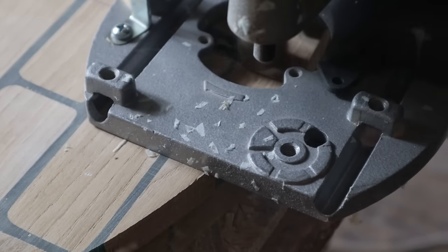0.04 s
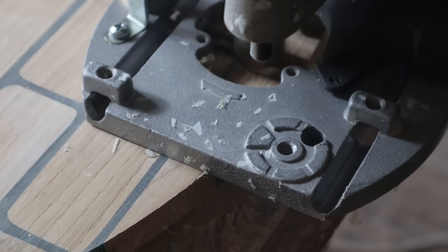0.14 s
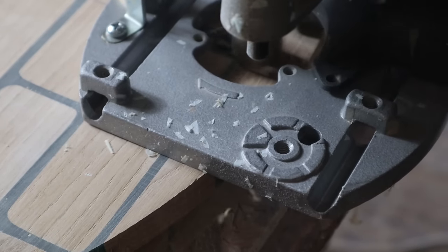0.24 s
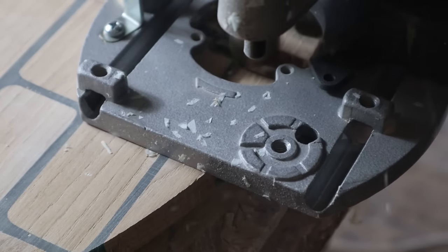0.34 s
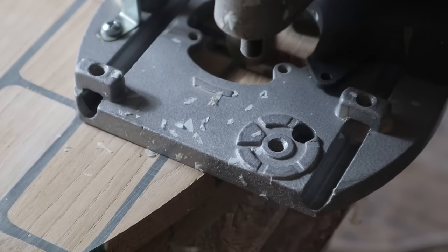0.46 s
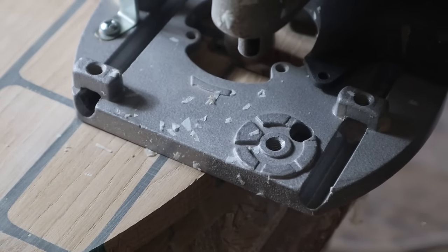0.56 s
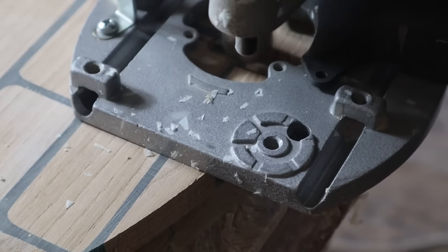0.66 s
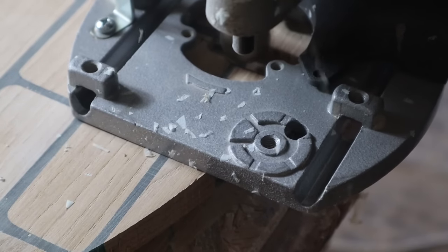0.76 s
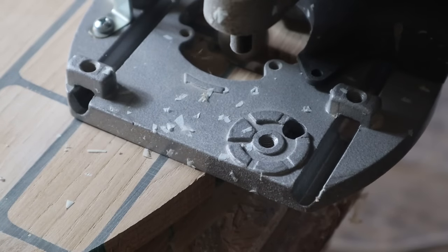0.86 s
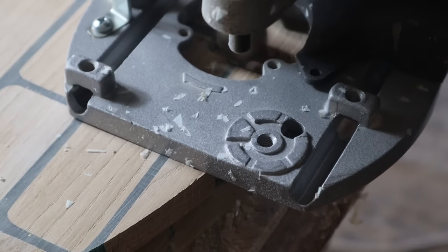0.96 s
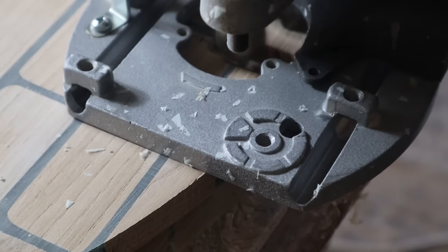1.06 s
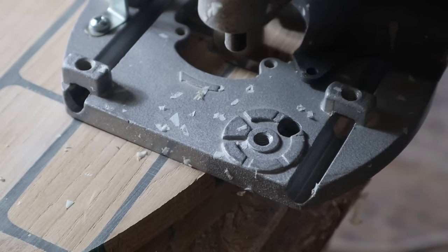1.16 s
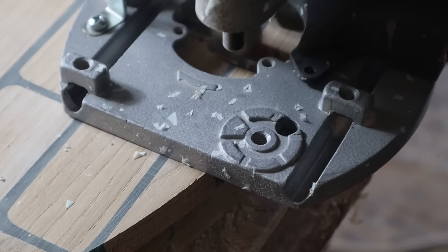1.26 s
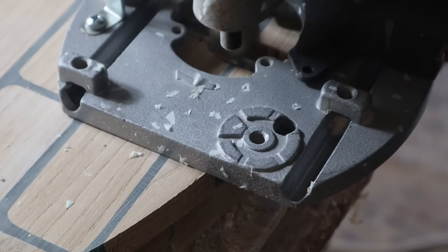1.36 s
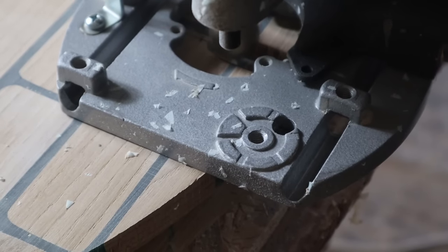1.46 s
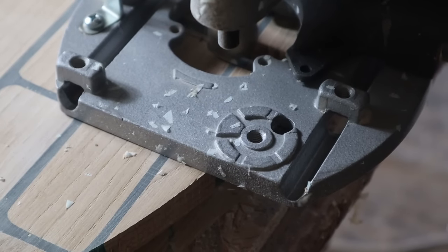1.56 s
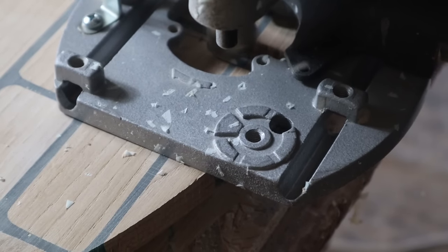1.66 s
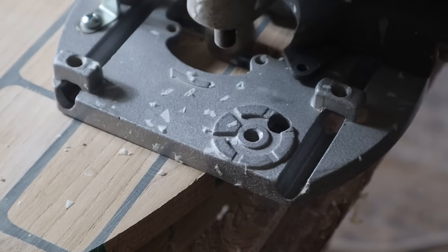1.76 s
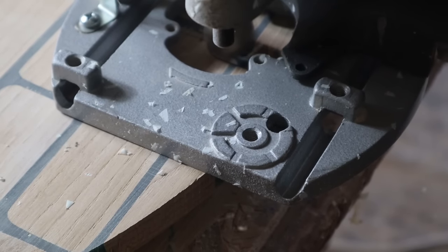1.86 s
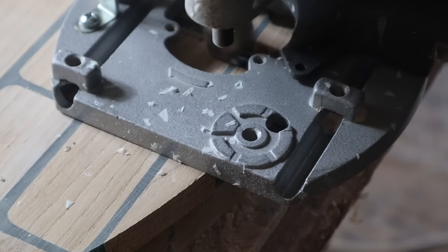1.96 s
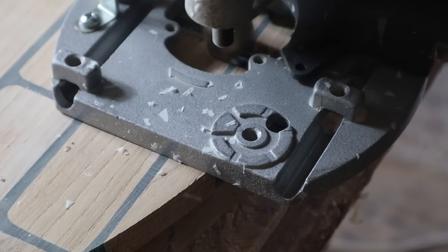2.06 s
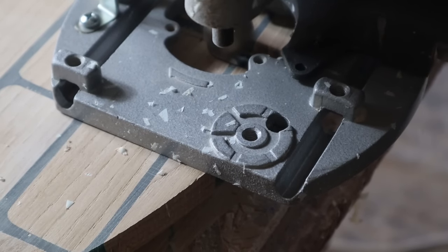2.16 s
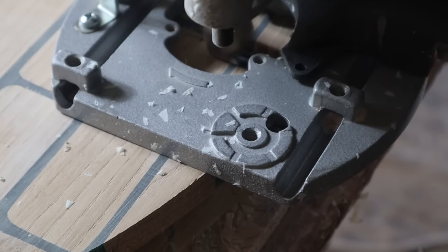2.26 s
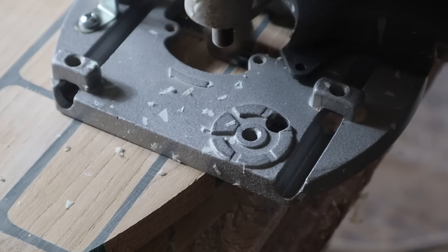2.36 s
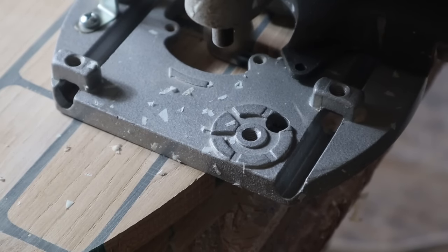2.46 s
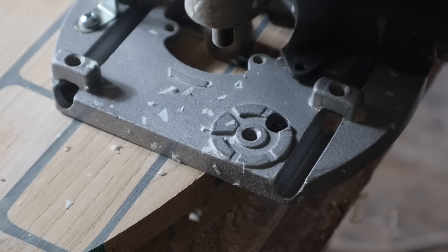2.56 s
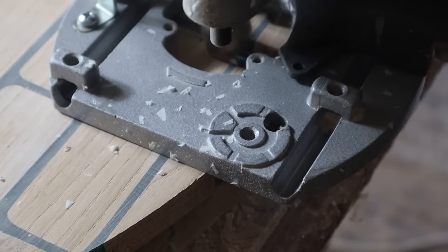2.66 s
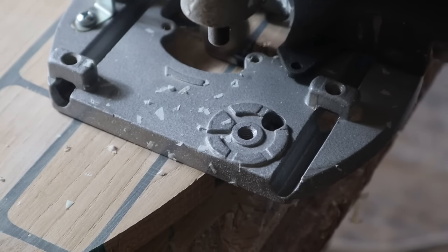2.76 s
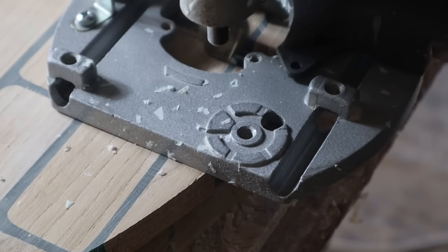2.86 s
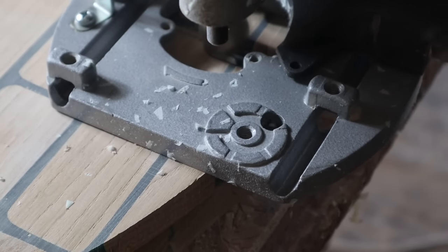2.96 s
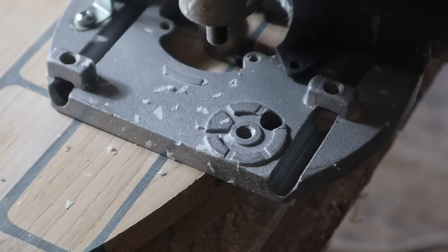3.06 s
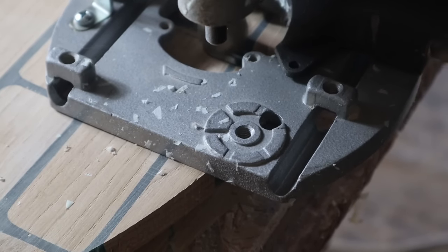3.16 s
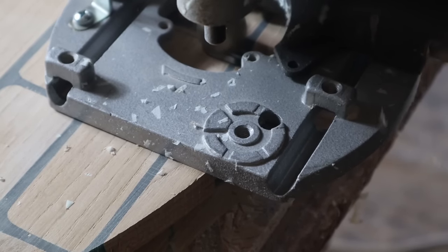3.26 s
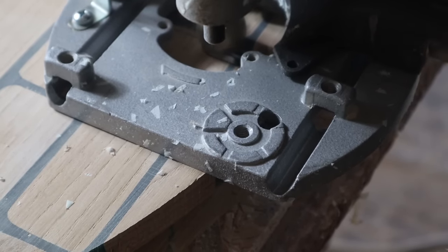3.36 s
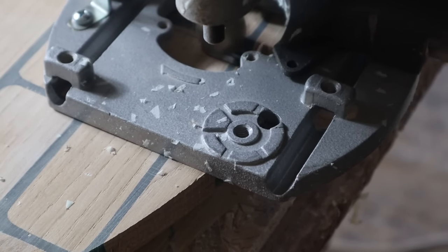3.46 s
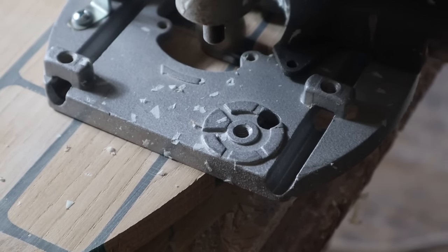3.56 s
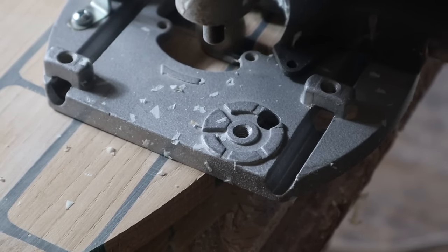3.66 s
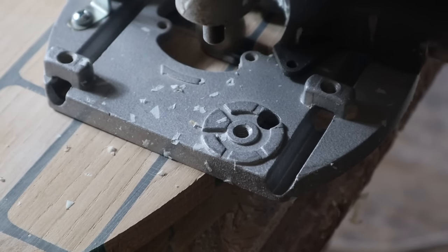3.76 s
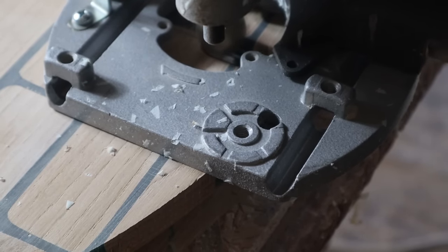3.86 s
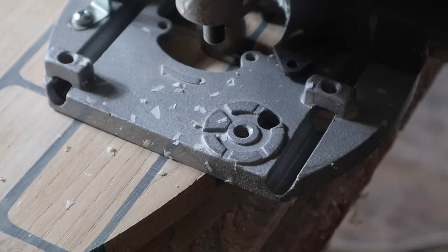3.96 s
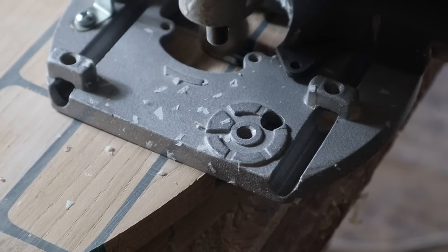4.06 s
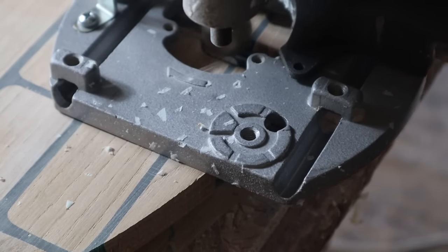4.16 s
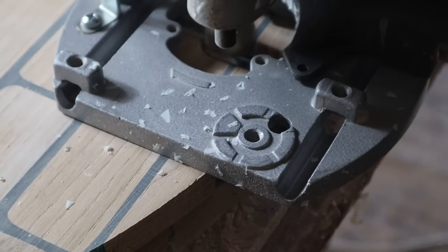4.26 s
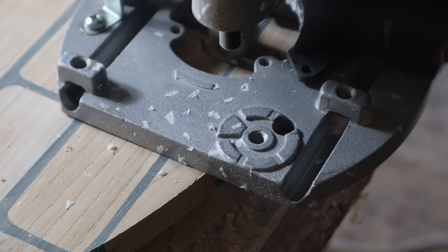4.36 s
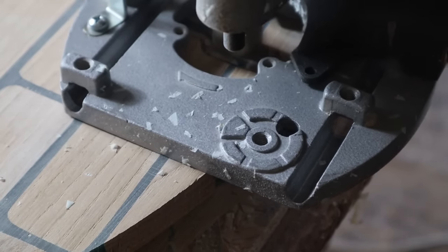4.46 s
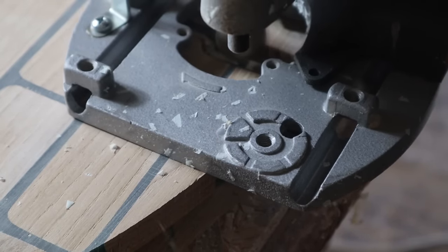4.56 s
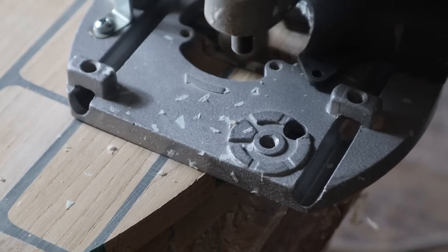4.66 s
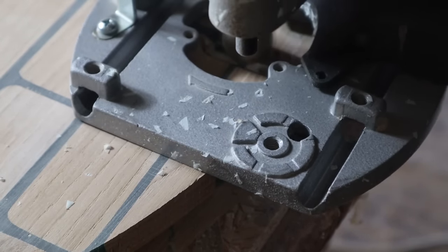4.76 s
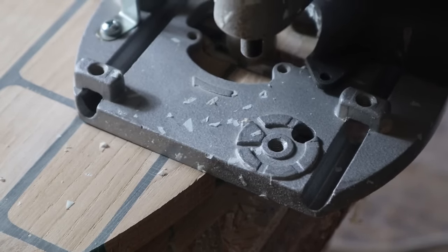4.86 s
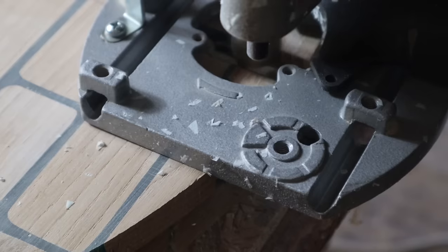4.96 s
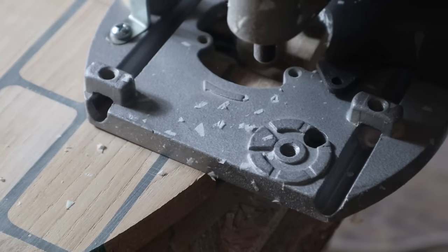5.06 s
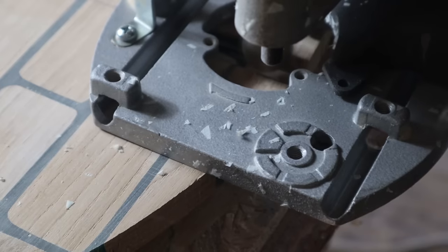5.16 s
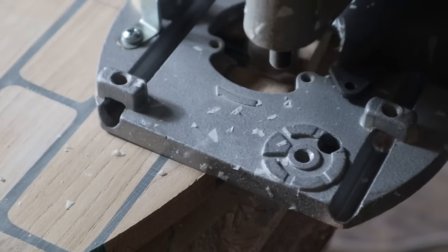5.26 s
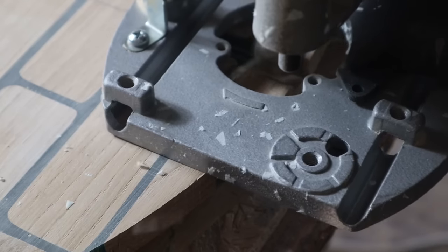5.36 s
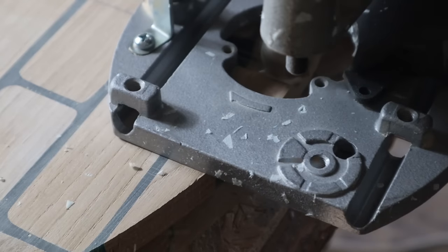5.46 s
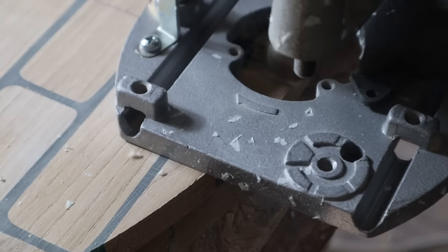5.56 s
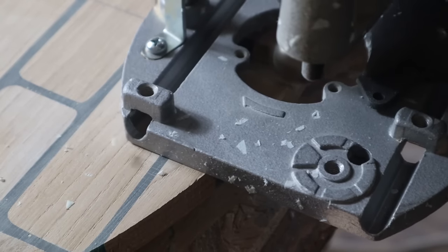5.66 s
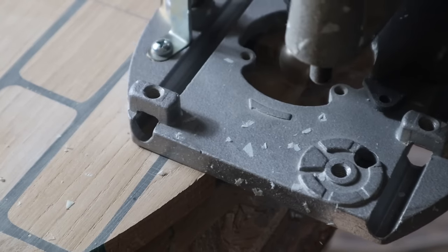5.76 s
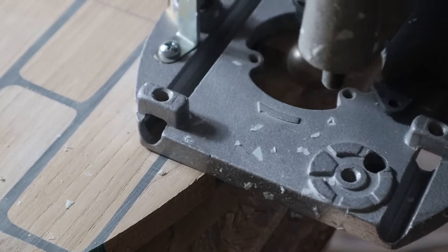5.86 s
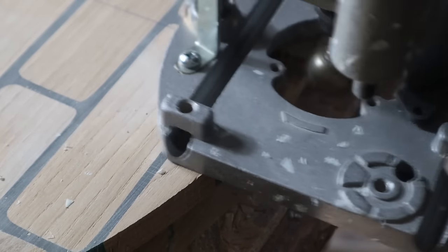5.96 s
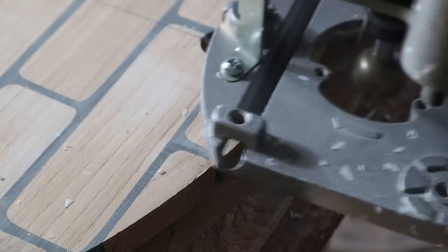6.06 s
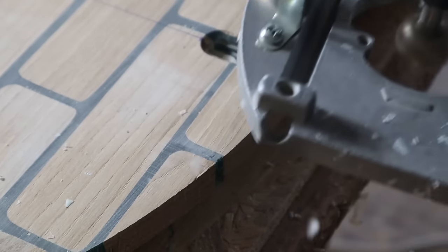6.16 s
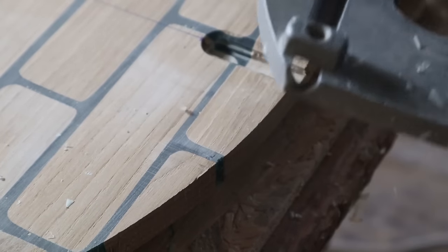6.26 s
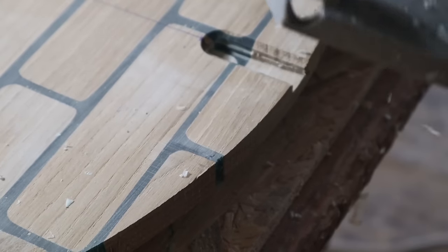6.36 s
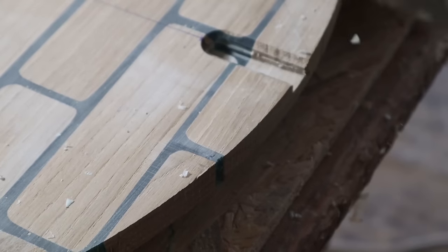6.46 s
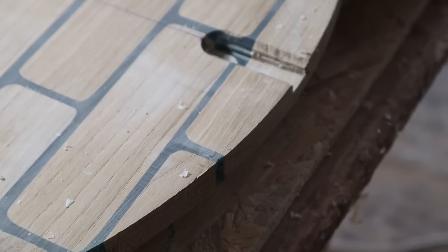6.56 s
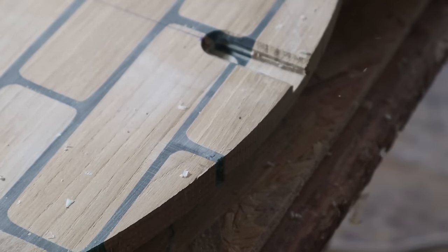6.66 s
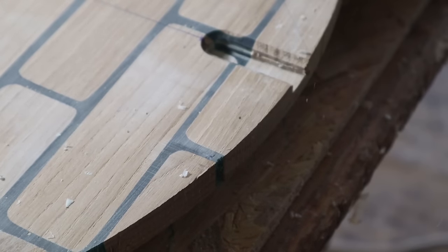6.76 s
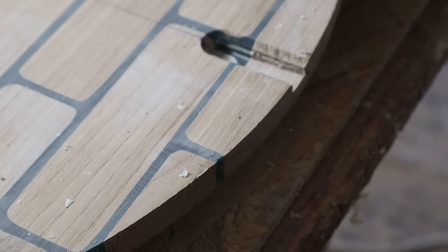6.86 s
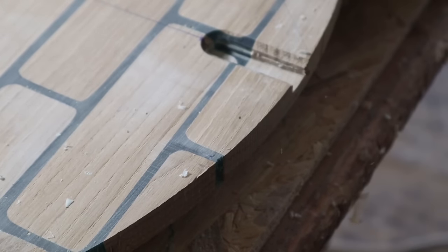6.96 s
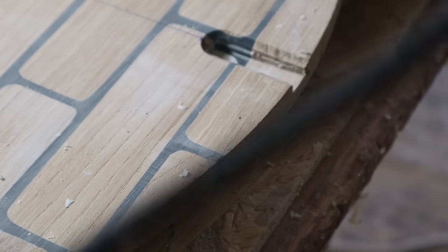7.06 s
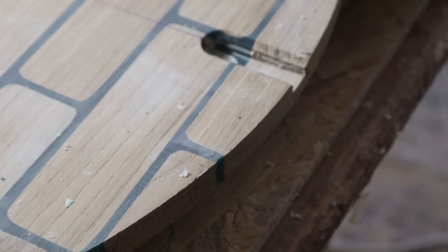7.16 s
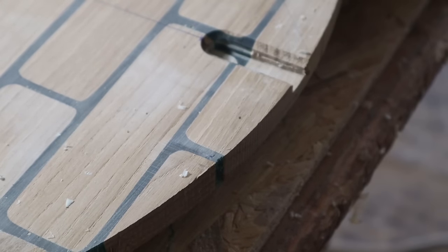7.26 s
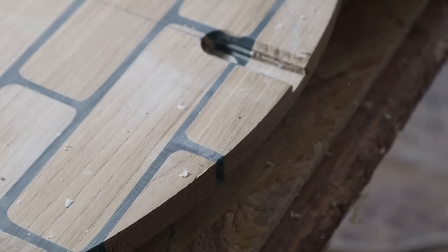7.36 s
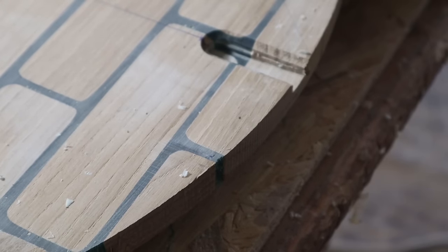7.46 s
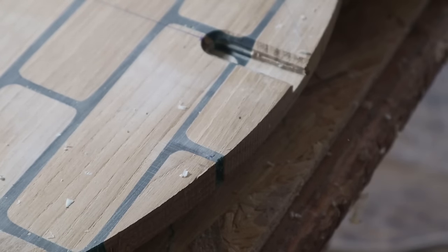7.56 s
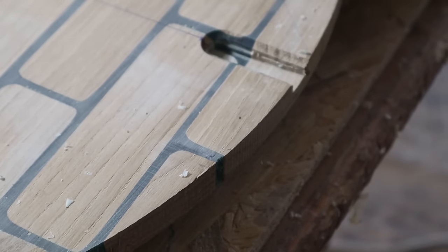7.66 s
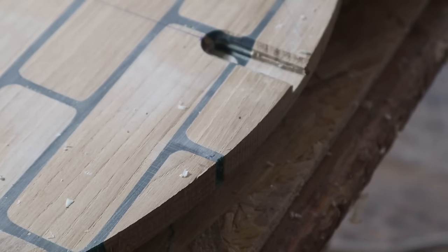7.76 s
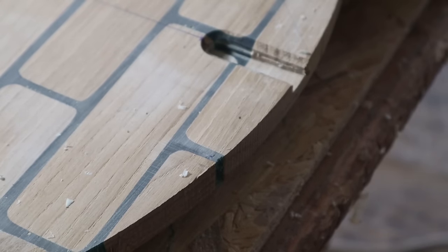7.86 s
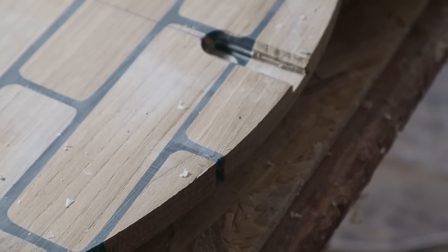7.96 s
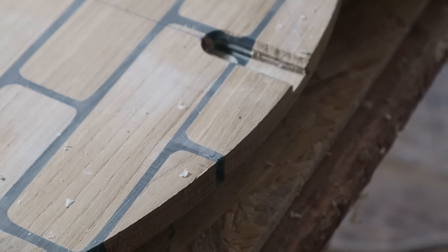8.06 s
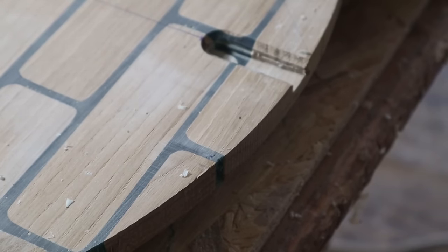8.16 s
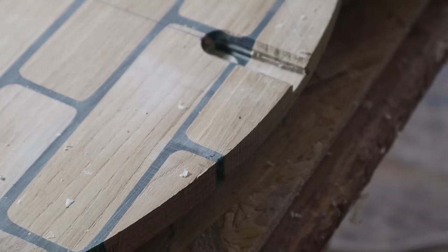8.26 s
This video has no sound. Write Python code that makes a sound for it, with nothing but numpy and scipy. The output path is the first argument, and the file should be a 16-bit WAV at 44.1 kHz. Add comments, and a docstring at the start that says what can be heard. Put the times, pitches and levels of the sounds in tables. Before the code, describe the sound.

Close, steady electric router whine with hissing airflow and irregular knocks of wind on the microphone, ending in a smooth, fading spin-down.

```python
"""A plunge router runs at full speed on a hardwood board: shaft and cooling fan give a stack of whining tones,
the fan's air rushes through the housing, and its exhaust throws eddies that thump and knock at the microphone.
At 5.75 s it is switched off and lifted away; the tones fall as air drag and friction slow the shaft.
From about 6 to 7 s a band of hiss sweeps down as the vents swing past, then the tool is turned away.
Echoes of the tones grow as it moves off, and a faint low room drone lies under everything."""
import sys
import numpy as np
from scipy import signal
from scipy.io import wavfile
from scipy.ndimage import uniform_filter1d

SR = 44100
rng = np.random.default_rng(int(sys.argv[2]) if len(sys.argv) > 2 else 0)


def wav_record(signal):
    """Record a signal, one row per channel, as 16-bit PCM in the file named by sys.argv[1]."""
    frames = np.transpose(np.atleast_2d(signal))
    bounded = np.clip(frames, -1, 1)
    # unit amplitude maps onto the largest positive 16-bit level
    quanta = np.round(bounded * 32767).astype(np.int16)
    wavfile.write(sys.argv[1], SR, quanta)


N = 366905
TIME = np.arange(N) / SR
CUTOFF_HZ = 15400  # nothing is heard far above this
OFF_S, LIFT_S = 5.7545, 0.31  # switch-off, and the time then taken to lift the tool clear


# Speed under power. Columns: start_s, turns_per_s
SPEED = [(0, 528), (.4, 529.3), (.8, 533.5), (1.15, 536.3), (1.95, 536.9), (2.66, 542), (3.0, 536.3),
         (3.2, 534.6), (3.58, 528.6), (3.79, 530), (4.44, 540.9), (5.1, 545.2), (5.72, 545)]
# Braking by the fan (as the square of its speed) and by the bearings (evenly)
DRAG_PER_TURN, FRICTION_HZ_PER_S = .0006063, 21.04


def shaft_speed():
    """Turns per second: nearly steady under power, then air drag and friction slow the shaft."""
    running, = read_curve(SPEED)
    even = np.sqrt(FRICTION_HZ_PER_S / DRAG_PER_TURN)  # the speed at which both brakes are equal
    off_for_s = np.maximum(TIME - OFF_S, 0)
    return even * np.tan(np.arctan(running / even) - DRAG_PER_TURN * even * off_for_s)


# Where the tool is. Columns: start_s, position (0 on the board, 1 lifted with open vents, 2 turned away)
POSITION = [(0,0.35),(5.75,0.34),(6.2,0.97),(6.55,0.88),(7.0,1.2),(7.25,1.39),(7.6,1.74),(8.32,2.4)]


def tool_position(times=TIME):
    """How far the tool has moved from the board, which changes its colour and direction."""
    return read_curve(POSITION, times)[0]


def lifted():
    """0 on the board, 1 once the tool is clear of it."""
    return np.clip((TIME - OFF_S) / LIFT_S, 0, 1)


# On the board, the three lowest tones swell and fade as the tool shifts.
# Hum, one wave per turn. Columns: start_s, level_db, left_minus_right_db
HUM = [(0, -42, 15), (.5, -47.5, 6), (.85, -37.5, 7), (1.55, -34.5, 9), (2.1, -37.5, 6), (2.28, -46, 21),
       (2.68, -33.5, 13), (2.9, -43, 13), (3.15, -35, 5.5), (3.65, -47, 11), (4.15, -34.5, 4),
       (4.42, -40, 14), (4.62, -35.5, 30), (5.35, -32.5, 15)]
# Its octave. Columns: start_s, level_db
OCTAVE = [(.25, -34), (.55, -42), (1.15, -39.5), (2.1, -45), (2.3, -37.5), (2.7, -38), (2.87, -46.5),
          (3.4, -36.5), (4.08, -45), (4.3, -40.5), (4.85, -41), (5.3, -32.5), (5.75, -34.5)]
# Its third harmonic. Columns: start_s, level_db
THIRD = [(.25, -43), (.8, -35), (1.6, -35), (2.7, -40.5), (2.95, -36.5), (4.6, -38), (5.05, -45.5),
         (5.72, -43)]
# Its fourth harmonic. Columns: start_s, level_db
FOURTH = [(1.1, -49), (1.6, -62), (2.8, -61), (3.1, -43), (3.55, -43.5), (4.0, -56), (5.0, -57),
          (5.75, -43)]
# The fan's blade tone, eight waves per turn. Columns: start_s, level_db, left_minus_right_db
BLADE = [(0, -42, 3), (.7, -38, 18), (2.4, -37.5, 29), (3.1, -39, 16), (4.4, -38.5, 17), (4.95, -40, 13),
         (5.3, -39, 5), (5.72, -34.5, 2), (5.88, -41, 4)]
# The whine an octave above it. Columns: start_s, level_db, left_minus_right_db
WHINE = [(0, -33, 28), (.6, -36, 2), (1.05, -31.5, -2), (1.85, -29, -13), (2.45, -37.5, -3),
         (3.3, -33.5, 3), (3.7, -32, 3), (4.4, -32.5, -2), (4.9, -36.5, 9), (5.55, -30.5, -6.5)]
# In the air the whine is beamed past the two microphone ports as the tool turns.
# Columns: position (no unit), left_minus_right_db, left_lead_rad
WHINE_AIM = [(.5, 3, 3), (.9, -7, -1.9), (1.15, 3, 1), (1.42, 5, -0.5), (1.7, -1, 2.0)]
# The two lowest tones dip briefly after switch-off. Columns: centre_s, half_length_s, depth_db
DIPS = [(5.825, 0.064, 7), (5.955, 0.022, 6), (6.19, .05, 12)]
TWELFTH_DB = -47.5  # a thin twelfth order, steady on the board
HUM_ROUGH, LIFTED_ROUGH = 0.096, 0.057  # wavering of the two lowest tones, and what lifting adds
COASTING_ROUGH = 0.31  # extra roughness of the third and fourth orders once lifted


def motor(angle, speed):
    """Unbalance and cutter give the low orders (waves per turn); fan blades give multiples of eight."""
    up = lifted()
    position = tool_position()

    def lifting(board_db, board_pan_db, in_air):
        """Blend level and balance from the board to the air."""
        air_db, air_pan_db = in_air
        return (1 - up) * board_db + up * air_db, (1 - up) * board_pan_db + up * air_pan_db

    hum, octave, third, fourth, blade, twelfth, whine, whistle = coasting(speed, flicker_db=2.0)
    waver = HUM_ROUGH + LIFTED_ROUGH * up
    ragged = COASTING_ROUGH * up
    dip = from_db(-bumps(DIPS, TIME))

    out = dip * tone(angle, *lifting(*read_curve(HUM), hum), spread=0.12, rough=waver)
    octave_mix = lifting(*read_curve(OCTAVE), 2 * drift(0.73), octave)
    out += dip * tone(2 * angle, *octave_mix, spread=0.9 - .5 * up, rough=waver)
    third_mix = lifting(*read_curve(THIRD), 2 + drift(.7), third)
    out += tone(3 * angle, *third_mix, spread=.3, rough=.17 + ragged)
    fourth_mix = lifting(*read_curve(FOURTH), drift(.7), fourth)
    out += tone(4 * angle, *fourth_mix, spread=.6, rough=.2 + ragged)
    out += tone(12 * angle, *lifting(TWELFTH_DB, drift(.7), twelfth), spread=.6, rough=.3)

    blades = 8 * angle
    blade_mix = lifting(*read_curve(BLADE), blade)
    out += tone(blades, *blade_mix, spread=0.82, rough=0.18 + ragged / 3, lead=0.48 + 1.0 * up)
    aim_db, aim_rad = read_curve(WHINE_AIM, position)
    whine_db, whine_pan_db = whine
    whine_mix = lifting(*read_curve(WHINE), (whine_db, whine_pan_db + aim_db))
    out += tone(2 * blades, *whine_mix, spread=0.8 - .6 * up, rough=0.12 + ragged / 4, lead=up * aim_rad)

    # the top whistle crosses the ports as the tool swings away (lead in radians)
    crossing = np.interp(position, [1.05, 1.45], [-2.6, 2.9])
    whistle_db, whistle_pan_db = whistle
    whistle_pan_db = whistle_pan_db + drift(1.9)
    return out + tone(4 * blades, whistle_db, whistle_pan_db, spread=0.2, rough=0.18, lead=crossing)


# Clear of the board, each tone changes with the speed.
# Columns: order (waves per turn), full_speed_db (before resonances and top loss),
# loss_db (per halving of speed), left_minus_right_db
COASTING = [(1, -42.5, 6.5, -1), (2, -39.5, 17.5, 0), (3, -44.5, 8.5, 0), (4, -43, 18, -10),
            (8, -50.5, -5, 4), (12, -41.5, 20, -5), (16, -25, 31, 0), (32, -20.5, 19.5, 2)]
# Resonances that lift or sink a tone falling through them. Columns: pitch_hz, half_width_hz, change_db
RESONANCES = [(289.5, 4, -18), (305, 4.6, 4.5), (318, 6.6, -5), (330, 3.4, 6), (374, 24, 7.5),
              (496, 12, 10.5), (970, 29, 0), (2480, 130, 0), (2670, 70, 9), (2920, 130, 11), (4300, 160, 6),
              (4720, 130, 6), (6700, 240, 4), (8150, 350, 4), (10650, 900, 3.5), (11600, 130, -5),
              (13050, 170, -8), (13600, 300, -4)]
TOP_HZ, TOP_LOSS_DB_PER_KHZ = 13900, 19  # above this the tones are lost


def coasting(speed, flicker_db):
    """Level and balance of each main tone in the air, shaped by shaft speed and resonances."""
    halvings = np.log2(speed.max() / speed)
    for order, full_speed_db, loss_db, pan_db in COASTING:
        hz = order * speed
        top_db = TOP_LOSS_DB_PER_KHZ * np.maximum(hz - TOP_HZ, 0) / 1000
        level_db = full_speed_db - loss_db * halvings + bumps(RESONANCES, hz) - top_db
        yield level_db + flicker_db * drift(6.7), pan_db


def tone(phase, level_db, pan_db, spread, rough, lead=0):
    """One order of the shaft; turbulence shakes it and shifting reflections turn it between the ears."""
    apart = (lead + spread * drift(0.35)) * np.array([[1], [-1]]) / 2  # radians, left then right
    shaken = phase + rough * drift(31)
    loudness = np.sqrt(2) * from_db(level_db) * panned(pan_db) * (1 + rough * drift(14.0))
    return loudness * np.sin(shaken + apart)


# Levels below are those at top speed; all of these tones weaken as the shaft slows.
# A sixth order sings at first, then sinks into the rush. Columns: start_s, level_db
FLUTTER = [(0,-42),(.45,-35.5),(1.0,-50),(5.8,-44),(6.2,-44),(8.32,-49)]
# A faint fifth order surfaces now and then. Columns: start_s, level_db
FIFTH = [(0,-49),(1.2,-39),(1.8,-43),(2.5,-41),(3.7,-39.5),(4.4,-43),(5.8,-52)]
# Other faint tones. Columns: order (waves per turn), peak_db (relative to the AIR level)
OVERTONES = [(7,-15),(15,-13),(17,-31),(24,-17),(48,-16)]


def overtones(angle, speed):
    """Uneven blades and commutator bars add faint orders that come and go, and weaken with the speed."""
    rush_db, _ = read_curve(AIR)
    out = tone(6 * angle, *read_curve(FLUTTER), drift(1), spread=1.0, rough=0.44)
    out += tone(5 * angle, *read_curve(FIFTH), drift(1), spread=1.0, rough=.4)
    for order, level_db in OVERTONES:
        audible = np.clip((CUTOFF_HZ - order * speed) / 500, 0, 1)  # silent above the cutoff
        shaken = order * angle + rng.uniform(0, np.pi, (2, 1)) + .5 * drift(23)
        out += audible * from_db(rush_db + level_db + 2 * drift(0.74)) * np.sin(shaken)
    return out * speed / speed.max()


# Rush of air. Columns: start_s, level_db (around 3 kHz, before a fixed lift in rush()),
# hiss_db (extra, growing from 4 kHz to its full value at 8 kHz)
AIR = [(0, -29, 1), (1.9, -30.5, 1.5), (5.58, -30.5, 0.7), (6.55, -32.5, 2), (6.9, -31.5, 2),
       (7.46, -38, 4), (7.85, -38, 6.5), (8.32, -37.5, 9.5)]
# Colour of the rush in each position. Columns of all three: pitch_hz, relative_level_db
ON_BOARD = [(100,-9),(450,-10.5),(700,-7.5),(1400,-5),(2000,-3),(2720,0),(3300,2.55),(5200,-8.5),(7700,-4),(9000,-7),(11100,3),(12100,-4.5),(13500,-8),(15000,-23)]
LIFTED = [(100,-40),(480,-13.5),(800,-6.5),(1050,-5.5),(1450,-1.5),(2000,-6),(2950,2),(4000,-4.5),(5000,-6),(7500,-5.5),(9900,-6),(12000,-8),(13200,-15),(15000,-54)]
AWAY = [(100,-36),(420,-9.5),(620,-6),(880,-0.5),(1100,-4),(1600,-0.5),(1900,-2),(2700,6),(3750,-6),(4600,-8),(6500,-13),(9500,-22),(12000,-19.5),(15000,-67)]
# Narrow resonances of housing and base plate on the board. Columns: pitch_hz, half_width_hz, change_db
HOUSING = [(2220, 310, 0), (2600, 49, 0.5), (2870, 74, 2), (3070, 60, -1), (3200, 71, -0.5), (3300, 50, -3),
           (4000, 70, 1.5), (6370, 76, -0.5)]
# A band of hiss sweeps down as the vents swing past. Columns: start_s, centre_hz, boost_db
SWEEP = [(6.1, 11600, 2), (6.35, 11000, 5), (6.6, 9880, 7), (6.8, 9750, 5), (7.0, 8950, 4.5),
         (7.12, 8500, 2)]
SWEEP_HALF_WIDTH_HZ = 1300
# How alike left and right hear the rush on the board. Columns: pitch_hz, likeness (0 to 1, no unit)
LIKENESS = [(100,0.88),(600,0.28),(1300,0.36),(2400,0.14),(4000,0.45),(5000,0.45),(7500,0.3),(10000,0.076),(12500,0.27)]
LIFTED_LIKENESS = 0.64  # in free air, at all pitches


def rush(flutter_db, patchy_db, size=1024):
    """Fan air as noise, coloured by the housing and by the way the vents face."""
    hz, times, (shared, left, right) = signal.stft(rng.standard_normal((3, N)), SR, nperseg=size)
    rush_db, hiss_db = read_curve(AIR, times)
    position = tool_position(times)
    up = np.interp(times, TIME, lifted())

    colour_db = np.outer(bumps(HOUSING, hz), 1 - up)
    for place, colour in enumerate([ON_BOARD, LIFTED, AWAY]):
        nearness = np.maximum(1 - abs(np.clip(position, 0, 2) - place), 0)
        colour_db = colour_db + np.outer(at_hz(colour, hz), nearness)
    sweep_hz, sweep_db = read_curve(SWEEP, times)
    colour_db = colour_db + sweep_db * np.exp(-((hz[:, None] - sweep_hz) / SWEEP_HALF_WIDTH_HZ) ** 2)
    gain = from_db(colour_db + np.outer(np.clip(hz / 4000 - 1, 0, 1), hiss_db))
    # the band around 3 kHz sets the level
    body = (hz > 2300) & (hz < 4000)
    gain *= from_db(rush_db + 1.5) / np.sqrt(np.sum(gain[body] ** 2, axis=0) / len(hz))

    # reflections off board and base plate ripple the colour, differently at each port, and shift slowly
    ripple = rng.standard_normal((2,) + gain.shape)
    ripple = uniform_filter1d(uniform_filter1d(ripple, size=4, axis=1), size=60, axis=2)
    alike = np.clip((1 - up) * at_hz(LIKENESS, hz)[:, None] + up * LIFTED_LIKENESS, 0, 1)
    late = np.exp(-1j * port_lead(hz[:, None], position))
    pan_db = np.interp(position, [.35, .85, 1.15, 1.6], [0.0, -3.0, -.5, 2.5])
    gain = gain * panned(pan_db)[:, None]
    ears = np.sqrt(alike) * np.array([shared, shared * late])
    ears = ears + np.sqrt(1 - alike) * np.array([left, right])
    spectrum = gain * from_db(patchy_db * rms_one(ripple)) * ears
    air = signal.istft(spectrum, SR, nperseg=size)[1][:, :N]
    return butter(air, 90, "high", order=4) * from_db(flutter_db * drift(34))


def port_lead(hz, position, opposed_rad=3.1):
    """Radians the left port leads: lifted, the right is nearer; away, treble comes in opposition."""
    lead_s = np.interp(position, [0, .85, 1.05, 1.4, 2], [.000005, -.00004, -.00003, .00008, .00014])
    return np.clip(2 * np.pi * hz * lead_s, -opposed_rad, opposed_rad)


# The strongest eddies on the microphone; a hard push makes a knock, a weak one a thump.
# Columns: start_s, suction_db, push (times the suction, no unit), left_minus_right_db
EDDIES = [(0.099, -23, 1.6, -7), (0.172, -20, 0.91, -7.0), (0.2271, -24, 0.6, -4.0),
          (0.3776, -20.0, 1.4, -3), (0.413, -24, 1.0, 5.0), (0.4396, -26, 0.9, 4), (0.4884, -22, 1.4, 6.0),
          (0.5373, -22, 1.0, 8), (0.574, -24, 1.1, -8), (0.7923, -22, 1.5, -2), (0.9322, -18, 1.9, 7),
          (1.032, -19, 0.6, -1), (1.0836, -25.0, 0.5, 0.0), (1.102, -21, 1.4, -4.0),
          (1.2883, -23.0, 0.8, -2.0), (1.3687, -21.5, 0.7, 1), (1.5418, -23, 0.98, -10),
          (1.5697, -17.5, 0.93, 3), (1.7063, -24, 1.6, -10), (1.7164, -23.0, 0.8, 9),
          (1.7998, -20.5, 0.3, -10.0), (1.8245, -20, 1.1, 1), (1.902, -17.5, 1.8, 5),
          (1.961, -17, 1.1, -5.0), (1.9896, -14.5, 0.8, 2.0), (2.02, -19, 0.6, -5.0),
          (2.1162, -18.5, 1.2, 5), (2.2617, -23, 1.5, 1), (2.3252, -21, 1.2, 4.0), (2.502, -15.5, 1.4, 8),
          (2.5476, -28, 1.4, 11), (2.5783, -23, 1.0, 5.0), (2.6464, -20.5, 0.7, 8), (2.7535, -23, 1.1, 4.0),
          (3.0145, -19, 0.89, 4.0), (3.0315, -24, 1.9, 7), (3.1874, -20, 1.2, 6), (3.3948, -19, 1.5, 9.0),
          (3.461, -21, 0.65, -6), (3.8975, -24, 0.8, 11), (3.926, -18.5, 1.4, 5.0), (4.0032, -19, 0.8, 2),
          (4.021, -17, 0.2, -1.0), (4.075, -22, 0.6, 0), (4.117, -21.5, 0.65, 7), (4.1691, -17.5, 1.4, 7),
          (4.2886, -19, 0.7, -6.0), (4.3732, -18.0, 0.78, 1), (4.421, -19, 1.2, -10), (4.5084, -19, 0.2, 1),
          (4.5398, -21, 0.22, 4), (4.6239, -12, 1.1, -9), (4.959, -23, 1.1, 6.0), (5.056, -18.5, 0.54, 5.0),
          (5.122, -20.5, 0.8, 10), (5.1822, -22, 0.9, 0), (5.292, -21, 0.2, 2), (5.414, -22.5, 0.7, 5.0),
          (5.5923, -23.0, 1.1, -5.0), (5.6196, -22, 0.8, 5.0), (5.7164, -19, 0.44, 5.0),
          (5.98, -34, 1.0, -9), (6.428, -29, 0.2, -5.0), (6.4537, -25, 0.5, -8.0),
          (6.5744, -26.5, 1.1, 5.0), (6.5973, -30, 0.5, -7.0), (6.9224, -33, 1.4, 6),
          (7.1717, -32.5, 0.2, -7.0), (7.2074, -30.0, 0.23, 8.0)]
# Lulls in the stream of small eddies. Columns: centre_s, half_length_s, depth_db
LULLS = [(.02, 0.047, 19), (.31, 0.032, 21), (3.6, 0.19, 2), (4.81, .08, 9), (6.12, .12, 8)]
STREAM_DB, STREAM_LIFTED_DB = -37.5, -56  # the stream on the board and lifted
WAKE_DB, WAKE_S = -7, 0.031  # small eddies trailing each big one: level relative to it, fading time


def exhaust(per_s, uneven_db, count=2400):
    """Big eddies in the exhaust knock and pop over a stream of small ones."""
    s, peak_db, push, pan_db = np.transpose(EDDIES)
    big = pressure_dips(s, from_db(peak_db) * panned(pan_db), push,
                        crossing_s=0.00078, soft_hz=323, bass_hz=52.7, push_hz=990)
    times, chance = rng.random((2, count)) * [[N / SR], [1]]
    sizes_db = uneven_db * np.clip(rng.standard_normal(count), -2, 1.2)
    happens = chance < per_s * N / SR / count
    gains = happens * from_db(sizes_db) * panned(rng.normal(0, 3.8, count))
    small = pressure_dips(times, gains, push=0.51,
                          crossing_s=0.0021, soft_hz=235, bass_hz=54, push_hz=910)

    stream_db = STREAM_DB + (STREAM_LIFTED_DB - STREAM_DB) * lifted() - bumps(LULLS, TIME)
    big_power = butter(np.mean(big ** 2, axis=0), 1 / (2 * np.pi * WAKE_S), "low", order=1)
    wake = from_db(WAKE_DB) * np.sqrt(abs(big_power))
    # turned away, the small eddies miss the microphone
    facing = np.clip(4 * (1.7 - tool_position()), 0, 1)
    stream = facing * np.hypot(from_db(stream_db), wake) * rms_one(small)
    return shared_bass(big + stream, below_hz=36)


def pressure_dips(times, gains, push, crossing_s, soft_hz, bass_hz, push_hz, push_ahead_s=0.00036):
    """Each eddy is a push, then a suction; it grazes one port, then hits the other. Strong ones cross faster."""
    def port(x, hz):
        """Soften the clicks, keeping the peak of a single one at its gain."""
        def colour(y):
            return butter(butter(y, hz, "low"), bass_hz, "high")
        return colour(x) / colour(signal.unit_impulse(SR // 20)).max()

    haste = np.minimum(gains.mean() / (gains.mean(axis=0) + 1e-9), 1) ** .5
    louder_side = np.sign(gains[1] - gains[0])
    lag = crossing_s * louder_side * rng.uniform(0.72, 1.4, len(times)) * haste
    dips, pushes = np.zeros((2, 2, N))
    for ear, side in enumerate([-1, 1]):
        at = np.clip((times + np.minimum(side * lag, 0)) * SR, 0, N - 1).astype(int)
        dips[ear, at] = gains[ear]
        pushes[ear, np.maximum(at - int(push_ahead_s * SR), 0)] = push * gains[ear]
    return port(pushes, push_hz) - port(dips, soft_hz)


def shared_bass(x, below_hz):
    """The slowest pressure swings reach both ports alike."""
    mid = x.mean(axis=0)
    return mid + butter(x - mid, below_hz, "high", order=1)


def workshop(x, t60, wall_hz, count=40):
    """Scattered echoes still carry the earlier, higher pitch, so a falling tone smears and beats."""
    out = np.zeros((2, N))
    for ear in range(2):
        delays = rng.uniform(.006, t60 / 2, count)
        gains = from_db(-60 * delays / t60) * rng.choice([-1, 1], count)
        gains = gains / np.linalg.norm(gains)
        for lag, gain in zip((delays * SR).astype(int), gains):
            out[ear, lag:] += gain * x[ear, :N - lag]
    return butter(out, wall_hz, "low", order=1)


def rumble(level_db, low_hz, high_hz):
    """The room's own faint low drone: a band of noise, nearly the same in both ears."""
    noise = rng.standard_normal(N) + 0.052 * rng.standard_normal((2, N))
    band = butter(butter(noise, low_hz, "high", order=4), high_hz, "low", order=4)
    return from_db(level_db) * rms_one(band)


def from_db(db):
    """Decibels to gain."""
    return 10 ** (np.asarray(db) / 20)


def read_curve(rows, at=TIME):
    """Read every column of a table at the given values of its first column."""
    first, *columns = np.transpose(rows)
    return [np.interp(at, first, column) for column in columns]


def at_hz(points, hz):
    """Read a spectrum on a log-frequency axis."""
    f, value = np.transpose(points)
    return np.interp(np.log(hz + 1), np.log(f), value)


def bumps(rows, x, size=1000):
    """Sum of bell shapes, each given as (centre, half width, height)."""
    grid = np.linspace(x.min(), x.max(), size)
    bells = sum(height * np.exp(-((grid - centre) / width) ** 2) for centre, width, height in rows)
    return np.interp(x, grid, bells)


def rms_one(x):
    """Scale to unit rms."""
    return x / np.sqrt(np.mean(x ** 2) + 1e-20)


def butter(x, hz, kind, order=2):
    """Causal low- or high-pass."""
    return signal.sosfilt(signal.butter(order, hz, kind, fs=SR, output="sos"), x + 1e-18)


def drift(rate_hz, step=40):
    """Slow random wandering with spread 1, drawn every few samples and joined by straight lines."""
    r = np.exp(-2 * np.pi * step * rate_hz / SR)
    noise = rng.standard_normal(N // step + 2002)
    slow = signal.lfilter([1], [1, -2 * r, r * r], noise)[2000:]  # skip the filter's settling
    return np.interp(np.arange(N) / step, np.arange(len(slow)), rms_one(slow))


def panned(pan_db):
    """Left and right gains of constant power; positive is louder on the left."""
    gains = from_db(np.array([pan_db, -pan_db]) / 2)
    return gains / np.sqrt(np.mean(gains ** 2, axis=0))


def scene():
    """Everything that turns follows the shaft angle; the echoes grow as the tool moves off."""
    speed = shaft_speed()
    angle = 2 * np.pi * np.cumsum(speed * (1 + 0.00019 * drift(5.3))) / SR
    tones = motor(angle, speed) + overtones(angle, speed)
    wet = from_db(np.interp(tool_position(), [.35, 1, 2], [-16, -9, -6]))
    echoes = wet * workshop(tones, t60=.45, wall_hz=5500)
    air = rush(flutter_db=0.5, patchy_db=1.37)
    eddies = exhaust(per_s=110, uneven_db=5.0)
    return tones + echoes + air + eddies + rumble(level_db=-62.5, low_hz=82, high_hz=128)


def record(dry):
    """The top is cut steeply."""
    return signal.sosfilt(signal.ellip(10, .1, 80, CUTOFF_HZ, fs=SR, output="sos"), dry)


dry = scene()
out = record(dry)
wav_record(out)
```